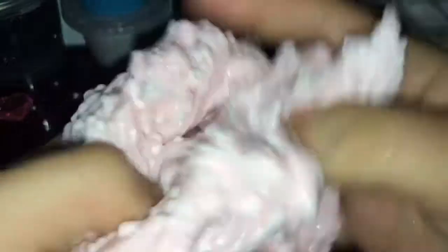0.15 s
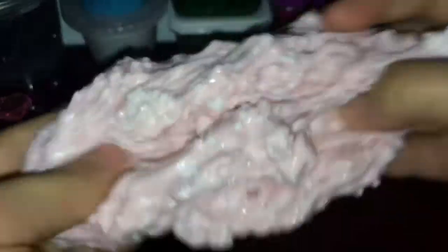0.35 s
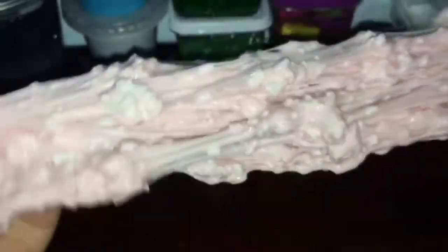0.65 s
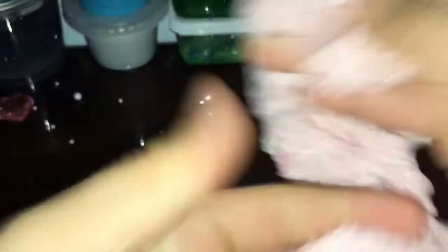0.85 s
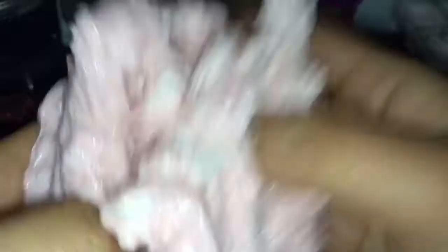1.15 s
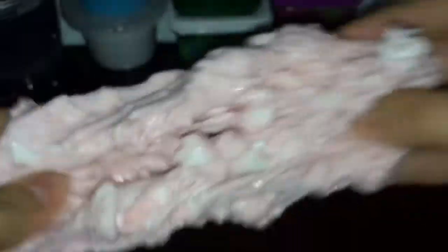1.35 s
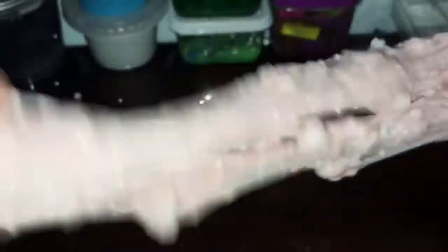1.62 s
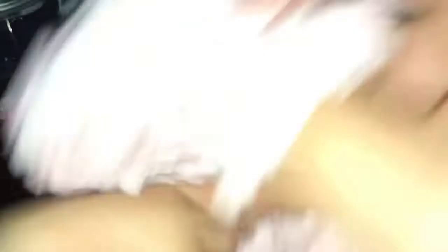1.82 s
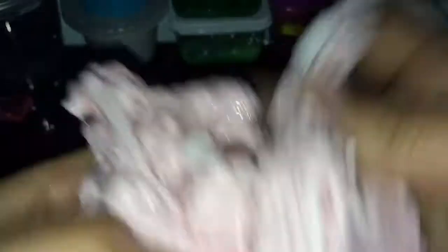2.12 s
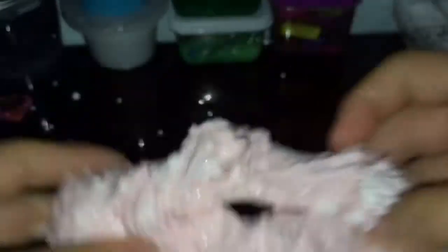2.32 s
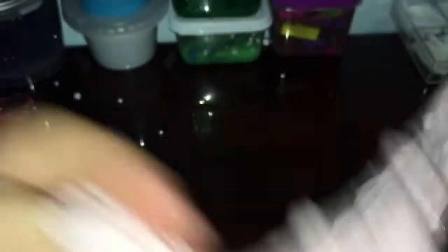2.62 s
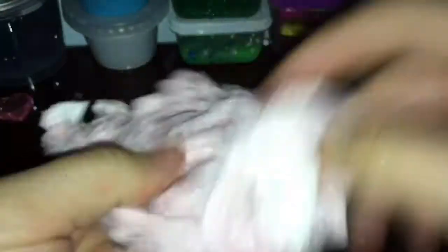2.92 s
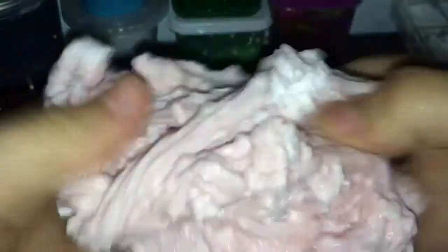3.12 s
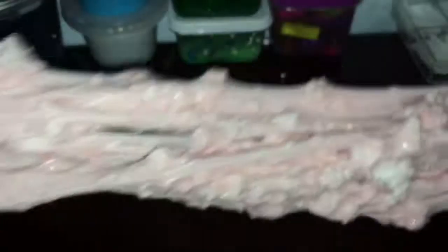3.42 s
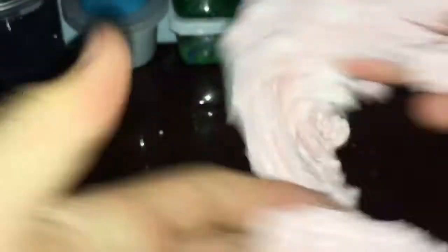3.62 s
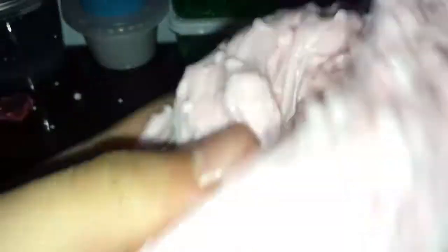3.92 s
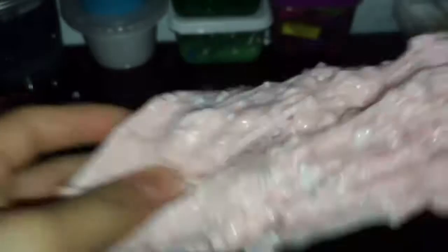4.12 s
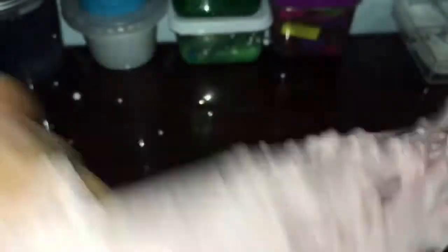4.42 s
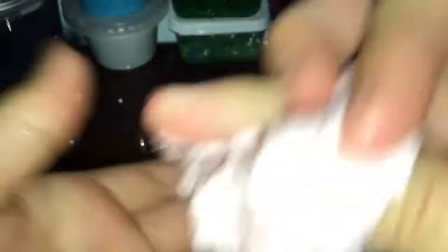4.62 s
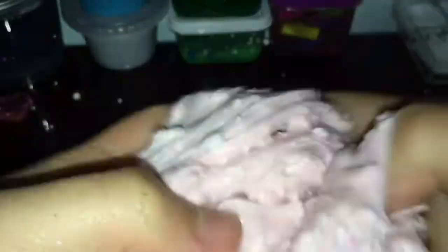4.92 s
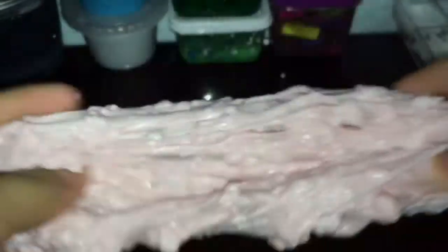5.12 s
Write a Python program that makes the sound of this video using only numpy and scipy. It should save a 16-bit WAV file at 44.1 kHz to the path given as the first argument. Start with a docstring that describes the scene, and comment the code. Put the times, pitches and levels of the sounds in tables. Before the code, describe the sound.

A lump of wet, lumpy slime is kneaded close to the microphone in a small, quiet room with faint hum and hiss. A crisp pop comes at once, then a first pull at 0.2 s brings dense sticky crackle and a bright double snap near 0.3. Short presses and a soft hollow bump follow around 0.7 to 1.0. More pulls start near 1.2, 2.2, 3.1, 4.0 and 5.0 s, each a rush of fine clicks and tiny wet bubbles that weakens as the strand thins. A strong ringing pop with a low bump lands at 1.6, followed by busy crunchy folding until 2.1. Small squelches and dull thuds appear near 3.0. It quietens around 3.5, then the loudest snap cracks at 3.9. Further sharp pops come near 4.16 and 4.36, a brief crunch and thud around 4.5 to 4.6, and the last pull crackles to the end.

```python
"""A lump of beaded slime is folded, squeezed and stretched by hand over a table, close to a microphone.
Trapped air pockets burst in sharp pops: each is a short noise click that rings a small cavity.
Under them are a fine sticky crackle of many tiny clicks, swelling with each pull and press, wet bubbles
that chirp for a few cycles, and squelches and dull thuds made of noise with a gliding pitch.
Now and then something hollow is bumped and rings softly; a low hum and airy hiss fill the small room."""
import sys
import numpy as np
from scipy import signal
from scipy.fft import rfft, irfft
from scipy.io import wavfile
from scipy.ndimage import uniform_filter1d

SR = 44100
rng = np.random.default_rng(int(sys.argv[2]) if len(sys.argv) > 2 else 0)


def transcribe(signal):
    """Save signal, clipped to [-1, 1], as a 16-bit WAV file at the path in sys.argv[1]."""
    frames = np.atleast_2d(signal).T
    limited = np.clip(frames, -1, 1)
    pcm = np.round(limited * 32767).astype(np.int16)
    wavfile.write(sys.argv[1], SR, pcm)


N = 231921  # length of the scene in samples

# room air and microphone hiss, only the shape of the spectrum: pitch_hz, level_db (per Hz)
AIR_SPECTRUM = [(20, -36), (35, -14), (60, -6), (85, 5), (110, 3), (135, -3), (220, -5), (320, -5.5),
                (410, -14), (490, -13), (650, -25), (1100, -24), (1500, -25), (6500, -29.5), (15000, -29)]
AIR_DB = -56  # overall level of the air and hiss
# the steady tones of the hum, before the slow swell: pitch_hz, level_db
HUM_TONES = [(82.4, -62), (165.5, -68)]
# slow rise and fall of the hum: time_s, gain_db
HUM_SWELL_CURVE = [(0, 8.5), (.2, 8), (.37, 6), (.62, 9.5), (.85, 2), (1.55, 2), (1.85, 7), (2.15, 3),
                   (2.7, 1.5), (2.92, 6.5), (3.35, 3.5), (3.62, -4.5), (4.05, 1.5), (4.65, -2), (5.26, 3.5)]
# how long the room's echo takes to fall by 60 dB: pitch_hz, fall_s
ROOM_FALL = [(300, 0.8), (3000, 0.43), (9000, 0.25), (16000, 0.11)]
ROOM_DB = -20.5  # level of the echo against the direct sound
# colour of the path from the slime to the microphone: pitch_hz, gain_db
PATH_COLOUR = [(200, -32), (600, -2.5), (1000, -4), (1400, 0.5), (3000, -0.5), (4500, 0), (6900, -5.5),
               (8200, -0.5), (11000, -2), (13700, 2), (14500, 4.5), (15600, -4.5)]
# soft bumps on something hollow: start_s, level_db, contact_s, pitch_share (multiplies every tone below)
HOLLOW_BUMPS = [(0.72, -41, 0.0075, 0.99), (.746, -46.5, 0.012, 0.98), (1.215, -53, 0.015, 0.94),
                (1.608, -38.5, 0.02, 0.99), (2.277, -48.5, 0.0089, 1), (2.463, -46.5, 0.032, 1.03),
                (2.754, -49, 0.00053, .97), (2.789, -47, 0.008, 0.95), (3.141, -51, 0.0094, 0.9),
                (4.977, -51.5, 0.013, 1.1)]
# tones of the hollow thing: pitch_hz, level_db (added to the bump's), fall_s (time to fall by 60 dB)
HOLLOW_TONES = [(305.2, 3.5, 0.22), (280, -1, 0.064), (366, -10, 0.13), (533, -4, 0.052), (567, -28, 0.071)]
# dull pushes of the hands and the lump: start_s, length_s, level_db, start_pitch_hz, end_pitch_hz
DULL_PUSHES = [(.187, 0.057, -50.5, 183, 144), (.253, 0.046, -53.5, 182, 150),
               (.262, .035, -60.5, 336, 266), (1.205, 0.042, -55.5, 219, 190),
               (1.222, 0.021, -58.5, 348, 300), (1.252, 0.029, -57.5, 252, 170),
               (2.275, 0.048, -57, 254, 214), (2.283, 0.082, -49, 84, 61.6),
               (2.475, 0.044, -62.5, 470, 427), (2.962, .053, -59, 252, 208), (2.98, 0.036, -64, 424, 360),
               (3.14, 0.031, -66, 269, 227), (4.606, 0.021, -48.5, 295, 258), (4.969, 0.023, -49, 137, 101),
               (4.972, .045, -60.5, 267, 217)]
# skin sliding on wet slime: start_s, length_s, level_db, start_pitch_hz, end_pitch_hz, sharpness_q
SKIN_SLIDES = [(0, 0.29, -66, 3310, 2700, 1.7), (0.698, 0.051, -59, 3680, 4420, 2.8),
               (.92, 0.068, -65, 1610, 2120, 2.5), (0.97, 0.074, -61, 2500, 2107, 1.3),
               (1.02, 0.063, -63, 1543, 1275, 5), (1.267, 0.043, -58, 3500, 3260, 4.5),
               (1.672, 0.032, -55, 4900, 4160, 3.6), (1.85, .1, -71, 1300, 1700, 1.5),
               (2.924, 0.065, -66, 2170, 2090, 15), (2.972, 0.051, -57, 1000, 752, 1.3),
               (2.98, 0.041, -65, 2500, 2295, 1.5), (3.128, .06, -70, 1200, 687, 1.5),
               (3.738, 0.051, -57, 2800, 3290, 4.8), (4.38, .16, -73, 1510, 1460, 12)]
# pulls, about once a second: start_s, firm_grip_s, whole_pull_s, crackle_level_db, treble_lift_db,
# thinning_db (change of level as the strand thins)
LUMP_PULLS = [(0.21, .21, .49, -48.5, 8.5, -7), (1.226, .06, .41, -48, 10, -7.5),
              (2.246, .04, .46, -46, 8, -9), (3.13, .14, .42, -47.5, 7, -11),
              (4.044, .14, .43, -46.5, 8.5, -7), (4.998, .1, .28, -46, 6.5, -7.5)]
# times of a pull: to take hold, to die down as the strand thins, to be let go
GRIP_S, THINNING_S, LET_GO_S = 0.02, 0.07, 0.02
# folds and presses between pulls: start_s, length_s, crackle_level_db, treble_lift_db
LUMP_PRESSES = [(-.04, .23, -53, 6), (0.693, .085, -51, 11), (0.838, .06, -55.5, 6),
                (0.904, .125, -50.5, 13), (1.013, .17, -56, 7), (1.64, .1, -50, 10), (1.786, .21, -48, 9),
                (1.988, .06, -52, 5), (2.048, .18, -53.5, 4), (2.539, .14, -54, 7), (2.721, .28, -53.5, 9),
                (2.966, .05, -45, 7), (3.582, .035, -58, 13), (3.629, .08, -55, 18), (3.71, .16, -51, 9.5),
                (3.855, .1, -51, 5), (3.962, .1, -62, 3), (4.397, .06, -52, 11), (4.463, .07, -57, 7),
                (4.517, .048, -45, 6), (4.565, .24, -55, 7), (4.781, .11, -48, 10), (4.87, .14, -63, 14)]
PRESS_EDGES = 0.75  # share of a press spent swelling and fading
REST_DB, REST_LIFT_DB = -70, 0  # crackle level and treble lift of slime left alone
SETTLE_S = .005  # stuck threads go on letting go for a moment after the hands ease
# the fine crackle, only the shape of the colouring: pitch_hz, gain_db
CRACKLE_COLOUR = [(150, -9), (500, 7), (900, 9), (1800, -2), (3000, 1), (4500, -1), (6500, -0.5),
                  (9000, -6.5), (13000, -5), (16000, -11.5)]
# air pockets that stand out, the largest bursting as several cavities at once:
# start_s, level_db (energy packed in 1 ms), pitch_hz, sharpness_q, tear_s (time the skin takes to tear)
AIR_POCKETS = [(0.0428, -18, 10500, 1.5, 0.000047), (0.162, -44, 11500, 4.4, .0002),
               (0.296, -35.5, 5300, 5.9, 0.0003), (0.3074, -34, 12000, 2.5, 0.00011),
               (0.3207, -23.5, 11000, 0.18, 0.00043), (0.3206, -18, 13500, 5.6, .0005),
               (.3441, -39, 8700, 1, .0001), (0.359, -41, 6000, 1.5, 0.00012),
               (.363, -42, 5860, 1.5, .0001), (0.3732, -35, 5040, 1.4, 0.00011),
               (0.388, -30, 14400, 2, 0.00013), (.3966, -41, 14100, 4, .0002),
               (0.407, -31, 6950, 0.27, .0003), (.4126, -35, 9800, 1.2, .0002),
               (0.4449, -29.5, 3950, 0.22, 0.00025), (.4842, -45, 11000, 1.5, 0.00022),
               (.494, -38, 7550, 1.5, .0002), (0.4965, -34, 11800, 0.6, 0.00026),
               (.6076, -52, 13800, 5, .0002), (.7465, -41, 12900, 0.91, .0002),
               (0.7496, -39.5, 2800, 2, .0005), (0.9456, -39, 8800, 5.3, .0003),
               (.9948, -40, 13000, 0.55, .0002), (1.0633, -39.5, 12000, .36, 0.0002),
               (1.1315, -25, 7260, 2.1, 0.00017), (1.14, -34, 10200, 0.57, .0001),
               (1.1974, -38, 4800, 1.2, 0.00035), (1.238, -30.5, 2200, 2.1, 0.00037),
               (1.238, -39, 8200, 6, 0.00018), (1.279, -39, 4500, 0.66, .0003),
               (1.3317, -36.5, 5860, 0.44, 0.00022), (1.395, -38, 3670, 0.64, 0.000075),
               (1.421, -39, 4060, 1.1, 0.00039), (1.484, -36, 9100, 0.17, 0.00023),
               (1.5422, -38.5, 7560, 2.2, 0.00016), (1.6021, -20.5, 5150, 8.3, 0.00021),
               (1.6013, -25, 4100, 8, 0.00018), (1.6019, -14.5, 8900, 1.8, 0.000095),
               (1.6479, -47, 9000, 1, .0002), (1.6622, -37.5, 8500, 2.3, .0001),
               (1.708, -28, 6950, 0.81, 0.0038), (1.742, -32, 4840, 5.3, 0.00061),
               (1.7472, -30.5, 13800, 2.5, .0001), (1.766, -30.5, 7460, 0.44, 0.00098),
               (1.802, -24, 6160, 20, 0.0029), (1.802, -37, 3080, 5.5, .0003),
               (1.8387, -37, 4960, 1.7, 0.00022), (1.862, -33, 7760, 0.72, 0.0018),
               (1.897, -33.5, 4740, 0.56, 0.00012), (1.905, -32, 2300, 3.6, 0.000071),
               (1.905, -27.5, 9900, 1.6, 0.00013), (1.937, -34, 8000, .4, .002),
               (1.947, -29.5, 4530, 0.45, 0.000093), (1.9972, -31.5, 14550, 3.7, 0.00014),
               (2.018, -39.5, 6500, .9, .0001), (2.0406, -41, 7000, 1.2, .0002),
               (2.1108, -34, 13500, 0.59, .0001), (2.1753, -36, 13000, 1.1, 0.00013),
               (2.1814, -31, 3160, 4.5, 0.00019), (2.234, -35, 6100, 0.34, 0.000045),
               (2.267, -33.5, 3570, 3.5, 0.00068), (2.2945, -31.5, 8500, 0.38, 0.00035),
               (2.3236, -41, 1890, .8, .0002), (2.3518, -44, 7960, .7, .0001),
               (2.397, -36.5, 4570, 2.5, .0002), (2.4032, -27.5, 2840, 0.54, 0.00011),
               (2.4129, -37, 4800, 1.2, .0002), (2.442, -30, 2980, 0.75, 0.00025),
               (2.4503, -40, 10900, 3, .0002), (2.4808, -40.5, 4600, 3.3, .0002),
               (2.528, -43, 4500, 5, .0003), (2.55, -41, 4800, 2.5, .0002),
               (2.565, -36, 13700, 0.46, 0.0017), (2.5784, -34.5, 4840, 1.5, 0.00015),
               (2.5924, -39, 12000, 1, .001), (2.615, -41, 5000, 2.3, .0002),
               (2.668, -40, 12100, 0.77, .0002), (2.695, -46, 4200, 1.4, 0.00018),
               (2.7237, -41, 3100, 2, .0003), (2.7354, -37.5, 2920, 2.2, 0.00075),
               (2.8111, -43, 13400, 4, .0002), (2.8276, -44, 7500, 1.1, .0002),
               (2.8484, -42, 4000, 0.36, .0002), (2.8933, -34.5, 6660, 0.95, 0.00012),
               (2.9054, -44, 9500, .8, .0002), (2.999, -37, 7500, .9, .0002),
               (3.0035, -41.5, 2770, 8, .0005), (3.072, -44, 3460, 5.6, 0.00066),
               (3.158, -33.5, 9600, 1.4, .0001), (3.173, -34, 8500, 1.4, .0008),
               (3.2049, -28.5, 5400, 0.31, 0.0017), (3.219, -33, 4000, 1.9, .0003),
               (3.2272, -31, 15000, 2, .0002), (3.2364, -35, 14000, 0.57, .0002),
               (3.2424, -33, 4900, 2.3, .0002), (3.2454, -23, 9000, 0.49, 0.00038),
               (3.2452, -31, 13100, 7.8, .0004), (3.269, -40, 4220, 0.92, 0.00022),
               (3.283, -39, 2410, 2.9, .0004), (3.288, -36, 4130, 0.97, 0.0003),
               (3.3226, -32, 7250, 0.62, 0.000076), (3.3274, -39, 13000, 0.34, 0.00034),
               (3.362, -33.5, 6400, 1.6, 0.00028), (3.3771, -41, 8100, 5, 0.00033),
               (3.3842, -43, 13400, 1.4, .0002), (3.4746, -32.5, 5340, 1.4, 0.004),
               (3.527, -43, 3900, 3, 0.0012), (3.656, -39, 7000, 0.67, .0002),
               (3.6967, -36, 4830, 0.35, 0.000096), (3.7298, -42, 12900, 2.5, .0002),
               (3.7357, -44, 12900, 2.5, .0002), (3.761, -40.5, 2840, 7.2, 0.0005),
               (3.7666, -31, 6900, 0.43, 0.00016), (3.7823, -34, 13440, 2.2, .0001),
               (3.8714, -32.5, 2440, 1.5, 0.00056), (3.8895, -7, 9100, 1.4, 0.00087),
               (3.89, -22.5, 1470, 3.5, 0.000096), (3.8905, -27.5, 2210, 1.3, 0.00019),
               (3.942, -43, 7500, .7, .0002), (3.9635, -40, 3470, 0.34, 0.00021),
               (4.037, -42.5, 6000, 0.8, .0001), (4.068, -33, 12000, 0.32, 0.00033),
               (4.0749, -32, 8140, 0.56, 0.00031), (4.0869, -34, 5500, 1.3, .0002),
               (4.1048, -23, 7800, 0.57, 0.0021), (4.139, -25, 6130, 0.48, 0.000066),
               (4.164, -17.5, 7200, 0.64, 0.000051), (4.1796, -36, 7750, 1.4, .0002),
               (4.192, -46, 4000, .7, .0002), (4.237, -39, 3790, 1.6, 0.00024),
               (4.2407, -39, 8500, 1, .0002), (4.2459, -46, 12700, 4, .0002),
               (4.2533, -40, 8600, 3.6, .0003), (4.2675, -34.5, 9400, 0.46, .0002),
               (4.2718, -33.5, 6800, 0.66, .0003), (4.3292, -44, 8500, 1.3, .0002),
               (4.3575, -15, 11600, 0.93, 0.00019), (4.408, -32.5, 14300, 0.39, .0001),
               (4.4338, -33, 9100, 0.36, 0.0001), (4.527, -27.5, 12000, 0.59, 0.00032),
               (4.536, -30, 4560, 0.69, 0.00057), (4.6138, -32.5, 8260, 0.8, 0.00086),
               (4.6337, -47, 13300, 3, .0002), (4.7133, -41.5, 3500, 0.57, .0003),
               (4.7409, -43, 8500, 0.92, .0002), (4.7526, -40, 6520, 0.65, 0.00018),
               (4.7963, -39, 9800, 2.7, .0002), (4.8067, -37.5, 12400, 1.7, 0.00018),
               (4.8248, -38, 4130, 1.1, 0.00035), (4.836, -36.5, 4000, 1.7, .0002),
               (4.841, -30, 14800, 0.54, 0.00022), (4.8624, -29, 13600, 0.16, 0.00008),
               (4.8779, -40, 10300, 1.4, .0002), (4.911, -38, 4870, 0.9, 0.00025),
               (5.0142, -32, 10600, 0.73, 0.00088), (5.027, -34, 8830, 1.6, .0003),
               (5.037, -33, 3500, .4, 0.00027), (5.048, -25.5, 14600, 0.68, 0.00068),
               (5.0553, -36, 13400, 1.3, .0002), (5.1009, -32.5, 12000, .5, .0001),
               (5.1045, -35.5, 15000, 1, .0001), (5.1173, -38, 5000, 0.37, .0002),
               (5.1225, -37.5, 6900, 3, .0002), (5.1272, -33.5, 1870, 0.66, 0.00036),
               (5.1308, -31.5, 13000, 0.72, 0.00012), (5.1574, -46, 3960, 1.6, 0.00033),
               (5.2023, -44, 6300, 2.5, 0.00018), (5.2225, -34.5, 12700, 0.4, 0.00069),
               (5.2398, -45, 4700, 4, .0003)]
EDGE_HZ = 16200  # top edge of what the recorder keeps


def amp(db):
    """Turns decibels into gain."""
    return 10 ** (np.asarray(db) / 20)


def unit(x):
    """Scales a sound to an rms (average strength) of 1."""
    return x / np.sqrt(np.mean(x ** 2) + 1e-20)


def read(points, hz):
    """Reads a curve between its points, with pitch on a log scale."""
    point_hz, value = np.transpose(points)
    return np.interp(np.log(hz + 1), np.log(point_hz), value)


def add(mix, s, sound):
    """Mixes a sound in at time s."""
    part = mix[max(round(s * SR), 0):][:len(sound)]
    part += sound[:len(part)]


def coloured(x, points, size=4096):
    """Filters by a gain curve without sounding ahead of time, so clicks keep their sharp front."""
    log_gain = np.log(amp(read(points, abs(np.fft.fftfreq(size, 1 / SR)))))
    taps = np.fft.ifft(np.exp(np.conj(signal.hilbert(log_gain)))).real
    return signal.oaconvolve(x, taps[:size // 2])[:len(x)]


def ring(x, hz, q):
    """Lets a sound ring one cavity: a single resonance, longer-lasting for a higher q."""
    w = 2 * np.pi * np.clip(hz, 20, SR / 2) / SR
    size = 2 * len(x)
    s = 2j * np.pi * np.fft.rfftfreq(size) / w
    response = s / (1 + s / max(q, .2) + s * s)
    return irfft(rfft(x, size) * response, size)[:len(x)]


def drift(rate_hz):
    """Random motion of rms 1, with little movement faster than rate_hz."""
    f = np.fft.rfftfreq(N, 1 / SR)
    noise = rfft(rng.standard_normal(N))
    return unit(irfft(noise * np.exp(-(f / rate_hz) ** 2), N))


def glide(length, start_hz, end_hz, width_hz, steady=0):
    """A soft swell of noise around a gliding pitch, with an optional steady core. Rms 1."""
    size = int(length * SR)
    f = np.fft.fftfreq(size, 1 / SR)
    noise = rng.standard_normal(size) + 1j * rng.standard_normal(size)
    flutter = np.fft.ifft(np.fft.fft(noise) / (1 + (2 * f / width_hz) ** 2))
    turn = np.exp(2j * np.pi * np.cumsum(np.linspace(start_hz, end_hz, size)) / SR)
    tone = ((steady + flutter / np.std(flutter)) * turn).real
    return unit(tone * signal.windows.tukey(size, .7))


def burst(hz, q, tear, scatter_db=-7, scatter_t60=0.011, low_cut=0.2, bass_hz=850, size=512):
    """One pocket: its skin snaps and tears, hands and table scatter the click, the cavity rings. Energy 1."""
    t, f = np.arange(size) / SR, np.fft.rfftfreq(size, 1 / SR) + 1
    rip, echoes = rng.standard_normal((2, size))
    snap = rip * np.exp(-(t / (1.04 * max(tear, 1 / SR))) ** 2)
    snap /= np.linalg.norm(snap)
    snap[0] = abs(snap[0]) + 0.6  # a firm front
    scatter = echoes * amp(-60 * t / scatter_t60) * (t > .0002)
    scatter *= amp(scatter_db) / np.linalg.norm(scatter)
    scatter[0] = 1  # the direct click
    click = np.convolve(snap, scatter)[:size]
    # the tear drives all bands alike, but a pocket radiates little far below its resonance
    uneven_db = 10 * np.log10(uniform_filter1d(abs(rfft(click)) ** 2, size=19) + 1e-9)
    radiation_db = -10 * np.log10((1 + (low_cut * hz / (f + 100)) ** 2) * (1 + (bass_hz / f) ** 2))
    click = coloured(click, np.c_[f, radiation_db - uneven_db], size=size)
    click = ring(click, hz, q)
    return click / np.linalg.norm(click)


def background(waver=0.38, wander_rad=0.42):
    """A hum, as of a fan, whose tones waver in strength and timing, over the room's hiss."""
    t = np.arange(N) / SR
    hum = np.zeros(N)
    for hz, db in HUM_TONES:
        strength = amp(db) * np.sqrt(2) * (1 + waver * drift(3.0))
        hum += strength * np.sin(2 * np.pi * hz * t + wander_rad * drift(10.0))
    swell = amp(np.interp(t, *np.transpose(HUM_SWELL_CURVE)))
    air = unit(coloured(rng.standard_normal(N), AIR_SPECTRUM))
    return hum * swell + amp(AIR_DB) * air


def room(x, first_s=.005, early_db=2):
    """Reflections from nearby things, then a short tail that dies faster in the treble."""
    t = np.arange(SR // 2) / SR
    early = 1 + amp(early_db) * np.exp(-t / .01)
    # scattered echoes, on average one every 8 samples
    taps = early * rng.standard_normal(len(t)) * (rng.random(len(t)) < 1 / 8)
    hz, age, z = signal.stft(taps, SR, nperseg=128)
    fall = amp(-60 * age / read(ROOM_FALL, hz)[:, None])
    tail = signal.istft(z * fall, SR)[1]
    out = np.zeros(N)
    add(out, first_s, signal.fftconvolve(x, tail / np.linalg.norm(tail)))
    return out


def bumps(level_db=0):
    """Soft contacts set a few low tones of a hollow thing ringing; a longer contact starts them gentler."""
    out, t = np.zeros(N), np.arange(SR // 2) / SR
    for s, db, contact, pitch in HOLLOW_BUMPS:
        tones = np.zeros(len(t))
        for hz, tone_db, t60 in HOLLOW_TONES:
            tones += amp(tone_db - 60 * t / t60) * np.sin(2 * np.pi * pitch * hz * t)
        add(out, s, amp(db + level_db) * tones * (1 - np.exp(-2 * t / contact)))
    return out


def thuds(width_hz=55, steady=3.6):
    """Each push is a few low cycles that sag in pitch, with no ring."""
    out = np.zeros(N)
    for s, length, db, start_hz, end_hz in DULL_PUSHES:
        add(out, s, amp(db) * glide(length, start_hz, end_hz, width_hz, steady))
    return out


def squelches(slips_hz=260, slip_db=4):
    """Fingers stick and slip on the wet surface; the gap under them colours the sound as it changes size."""
    out = np.zeros(N)
    for s, length, db, start_hz, end_hz, q in SKIN_SLIDES:
        add(out, s, amp(db) * glide(length, start_hz, end_hz, start_hz / q))
    slips = unit(amp(slip_db * drift(slips_hz)))
    return out * slips


def kneading():
    """How hard the slime is worked (dB) and how bright it crackles (dB): pulls and presses add their power."""
    t = np.arange(N) / SR
    strokes = [(np.full(N, amp(REST_DB)), REST_LIFT_DB)]
    for s, grip, length, db, lift_db, thinned_db in LUMP_PULLS:
        thinned = 1 - np.exp(-np.maximum(t - s - grip, 0) / THINNING_S)
        let_go = np.exp(-np.maximum(t - s - length, 0) / LET_GO_S)
        held = np.clip((t - s) / GRIP_S, 0, 1) * let_go
        strokes.append((held * amp(db + thinned_db * thinned), lift_db))
    for s, length, db, lift_db in LUMP_PRESSES:
        from_edge = np.minimum(t - s, s + length - t) / (length / 2)
        swell = np.sin(np.pi / 2 * np.clip(from_edge / PRESS_EDGES, 0, 1))
        strokes.append((amp(db) * swell, lift_db))
    power = sum(gain ** 2 for gain, _ in strokes)
    keep = np.exp(-1 / (SETTLE_S * SR))
    settled = signal.lfilter([1 - keep], [1, -keep], power - power[0]) + power[0]
    # where strokes overlap, the stronger one counts more in the brightness
    brightness_db = sum(gain ** 2 * lift_db for gain, lift_db in strokes) / power
    return 10 * np.log10(settled), brightness_db


def crackle(per_s=1000, spread_db=3.7, crowding=.2, level_db=-1, fizz_db=-8, count=64):
    """Tiny bubbles and sticky threads let go in clumps; harder kneading makes them more frequent and louder."""
    effort_db, lift_db = kneading()
    clumps = amp(1.8 * drift(45))
    rate = per_s * amp(crowding * (effort_db - effort_db.mean())) * clumps
    sizes = amp(spread_db * np.minimum(rng.exponential(1, N), 3.3))
    happens = rng.random(N) < rate / SR
    # crowded clicks are made weaker, so that the loudness is set only at the end
    clicks = sizes * rng.choice([-1, 1], N) * happens / np.sqrt(rate)
    kind = rng.integers(0, count, N)
    grains = np.zeros(N)
    for k, hz in enumerate(np.geomspace(1400, 15000, count)):
        q = rng.uniform(1, 7)
        grain = burst(hz, q, rng.uniform(.00003, 0.0003), scatter_db=-1.5, low_cut=0.75)
        for i in np.flatnonzero(clicks * (kind == k)):
            add(grains, i / SR, np.sqrt(hz) * clicks[i] * grain)
    fizz = amp(fizz_db) * rng.standard_normal(N)
    sound = unit(coloured(unit(grains) + fizz, CRACKLE_COLOUR))
    # each pull or press has its own treble lift, making its crackle brighter or duller
    body = signal.sosfiltfilt(signal.butter(2, 6000, fs=SR, output="sos"), sound)
    lift = amp(lift_db - 2.0)
    sound = (body + lift * (sound - body)) / np.sqrt((1 + lift ** 2) / 2)
    return amp(effort_db + level_db) * unit(clumps) * sound


def bubbles(per_s=120, level_db=-8.0, spread_db=4, crowding=.3, follow=0.92,
            low_hz=2500, high_hz=12000, cycles=0.67, rise=0.013, size=400):
    """Tiny wet bubbles open without a snap: each sings a few cycles and rises a little in pitch."""
    effort_db = kneading()[0]
    mean_db = effort_db.mean()
    # running count of bubbles due; per_s is the rate at average effort
    due = np.cumsum(per_s * amp(crowding * (effort_db - mean_db))) / SR
    out, t = np.zeros(N), np.arange(size) / SR
    for k, (wait, strength, place, damping) in enumerate(rng.random((int(due[-1]), 4))):
        i = np.searchsorted(due, k + wait)
        hz = low_hz * (high_hz / low_hz) ** place
        age = t * hz / (cycles * 2 ** (2 * damping - 1))
        song = np.sin(2 * np.pi * hz * t * (1 + rise * np.minimum(age, 6)))
        blip = age * np.exp(-age) * song
        chance_db = spread_db * (min(-np.log(1 - strength), 3) - 2)
        db = mean_db + level_db + follow * (effort_db[i] - mean_db) + chance_db
        add(out, i / SR, amp(db) * np.sqrt(SR / per_s) * blip / np.linalg.norm(blip))
    return out


def small_pops(per_s=11, level_db=-48, spread_db=3, follow=0.11, crowding=0.95,
               low_hz=3000, high_hz=14000, q=1.1, tear=0.0002, count=200):
    """Lesser pockets burst by chance, more often and a little louder the harder the slime is worked."""
    effort_db = kneading()[0]
    effort_db = effort_db - effort_db.mean()
    # running count of pops due; per_s is the rate at average effort
    due = np.cumsum(per_s * amp(crowding * effort_db)) / SR
    out = np.zeros(N)
    for k, (wait, size, place, damping) in enumerate(rng.random((count, 4))):
        i = np.searchsorted(due, k + wait)
        hz = low_hz * (high_hz / low_hz) ** place
        pop = burst(hz, q * 2 ** (2 * damping - 1), tear)
        if i < N:
            db = level_db + follow * effort_db[i] + spread_db * (2 * size - 1)
            add(out, i / SR, amp(db) * np.sqrt(SR / 1000) * pop)
    return out


def pops(level_db=0):
    """The larger air pockets, one by one: each skin tears with a click that rings its cavity."""
    out = np.zeros(N)
    for s, db, hz, q, tear in AIR_POCKETS:
        add(out, s, amp(db + level_db) * np.sqrt(SR / 1000) * burst(hz, q, tear))
    return out


def scene():
    """The slime near the microphone, in its room, with the bumps, thuds and background."""
    slime = coloured(pops() + small_pops() + bubbles() + crackle() + squelches(), PATH_COLOUR)
    echo = amp(ROOM_DB) * room(slime)
    return (slime + echo + bumps() + thuds() + background())[None]


def record(dry, ceiling=0.72):
    """The recorder cuts the deepest bass, softly rounds off high peaks and drops the top treble."""
    thinned = signal.sosfilt(signal.butter(4, 32, "high", fs=SR, output="sos"), dry)
    rounded = thinned / (1 + (thinned / ceiling) ** 4) ** .25
    taps = signal.firwin(301, EDGE_HZ, window=("kaiser", 8), fs=SR)
    return signal.oaconvolve(rounded, taps[None], "same")


dry = scene()
out = record(dry)
transcribe(out)
```